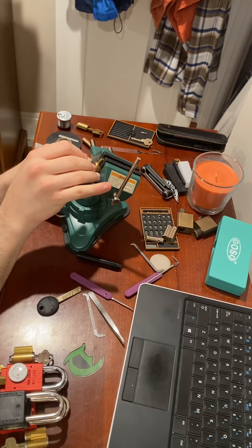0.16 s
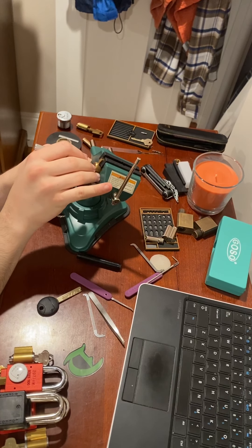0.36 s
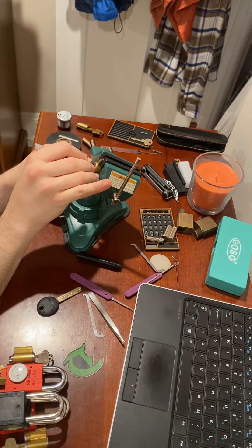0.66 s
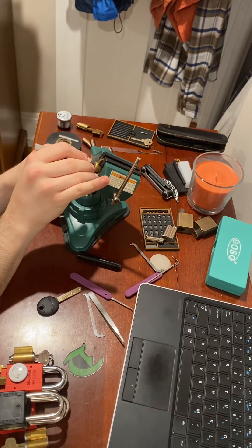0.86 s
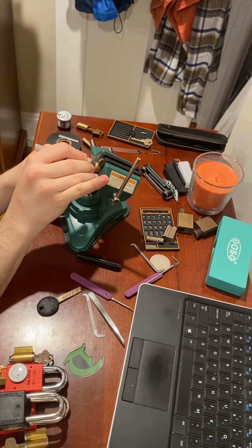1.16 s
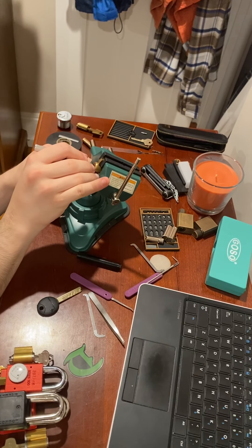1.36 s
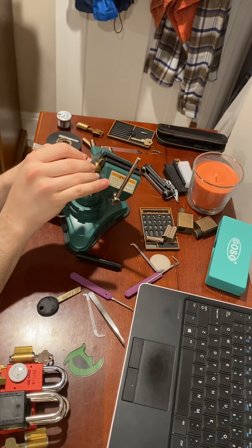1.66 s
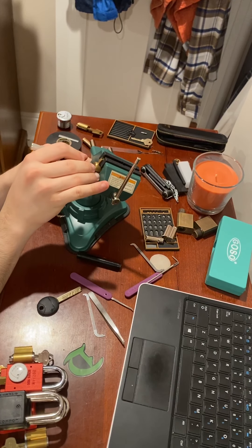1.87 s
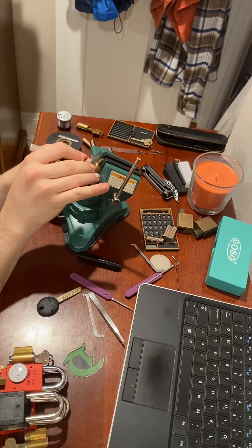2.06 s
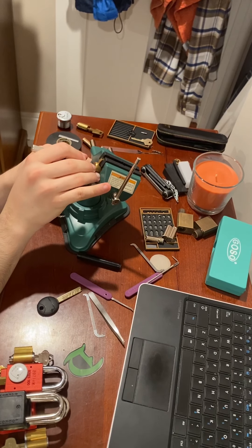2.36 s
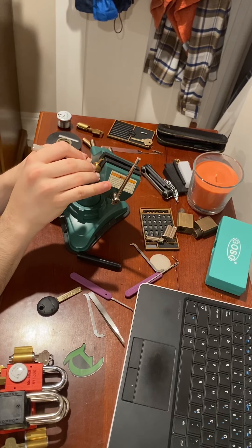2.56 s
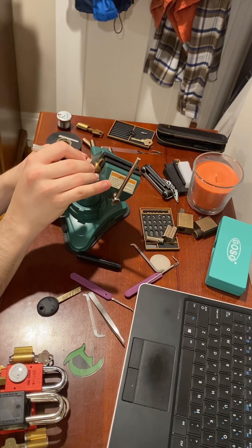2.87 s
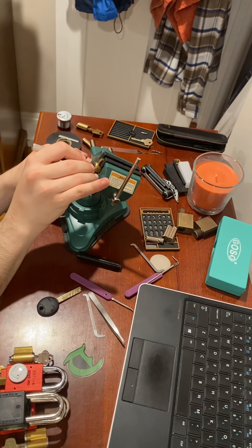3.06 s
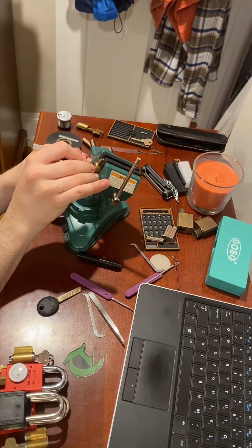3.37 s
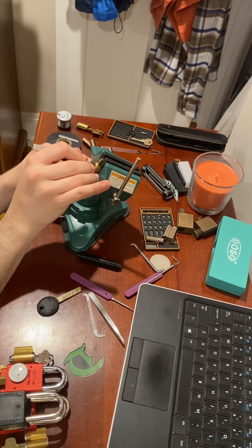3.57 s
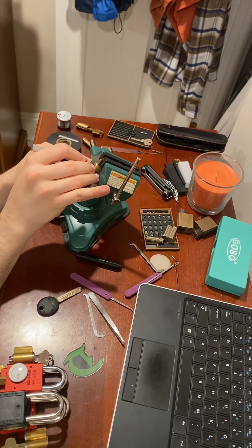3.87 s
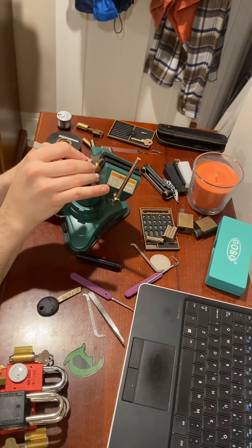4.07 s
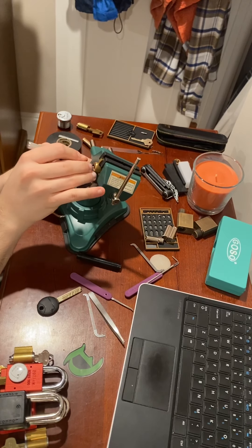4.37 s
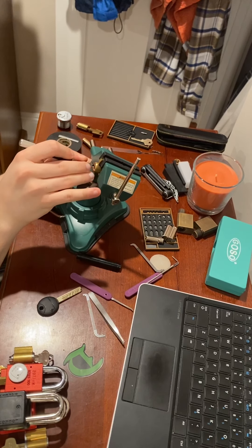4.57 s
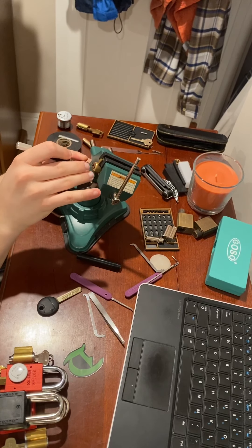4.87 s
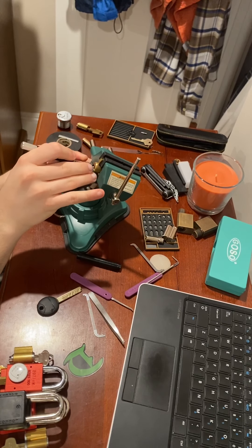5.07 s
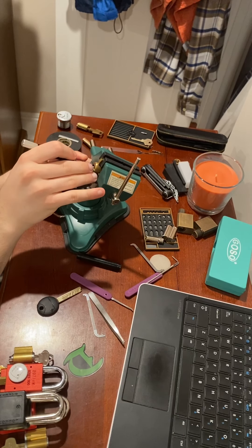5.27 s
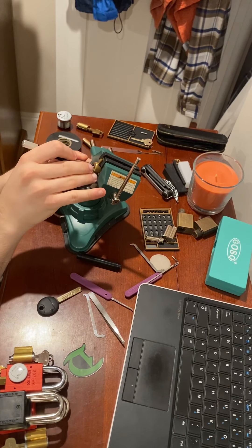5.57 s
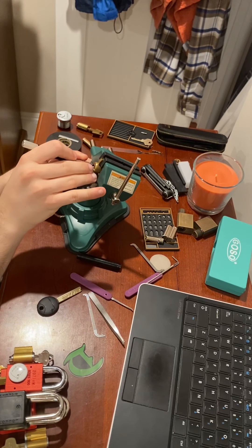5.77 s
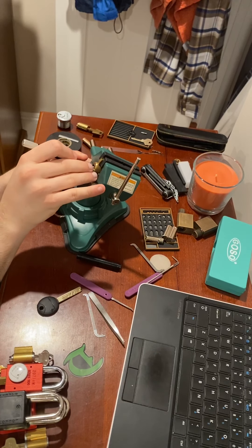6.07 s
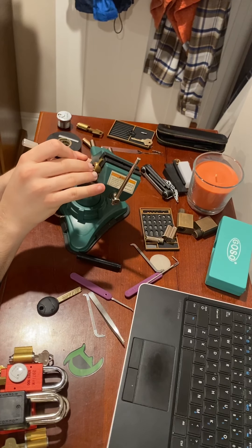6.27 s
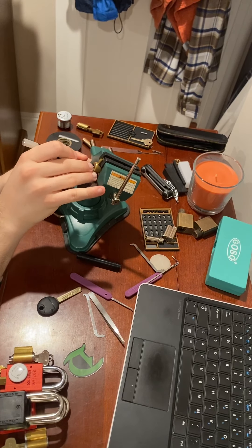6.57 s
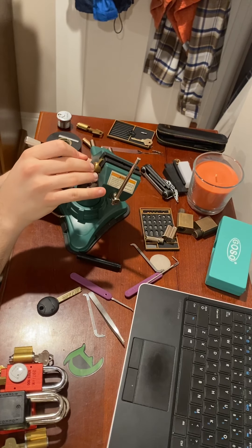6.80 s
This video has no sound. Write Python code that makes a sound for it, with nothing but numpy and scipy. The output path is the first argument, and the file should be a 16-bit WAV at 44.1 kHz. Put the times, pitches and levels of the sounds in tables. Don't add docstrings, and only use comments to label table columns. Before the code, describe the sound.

A small quiet room with steady, soft, low-heavy air, fuzzy motor and duct drones and a faint low appliance hum. Close by, a pick touches brass pins almost inaudibly at the start. Crisp little ticks come at 0.9, 1.6 (a pair with a soft desk push), a very faint one at 1.9 with a firmer push, and 2.2. After a gap, a weak tick at 2.95 leads to a much sharper click at 3.04, followed by a short dull metal rub and soft thuds. From 4.33 to 4.55 a gritty scrape carries a rapid cluster of ticks and slips, with a deep push at 4.48. Near silence follows until 6.18, when the plug grinds for an instant and snaps loudly, ringing briefly and jolting the desk with a deep after-thud. Two small ticks finish at 6.56 and 6.74. Hard reflections and a short room tail trail the clicks.

```python
import sys
import numpy as np
from scipy import signal
from scipy.fft import rfft, irfft, next_fast_len
from scipy.io import wavfile
from scipy.ndimage import uniform_filter1d

SR = 44100
rng = np.random.default_rng(int(sys.argv[2]) if len(sys.argv) > 2 else 0)


def undo_db(level):
    steps = np.asarray(level, float) / 20
    return 10 ** steps


def store_wav(level_fs):
    pcm = np.round(np.clip(np.atleast_2d(level_fs), -1, 1) * 32767)
    wavfile.write(sys.argv[1], SR, pcm.T.astype(np.int16))


N = 305921

# [t/s, blow level/dB, then re blow: lock body level/dB, vise level/dB, wrench level/dB]
TICKS = [(0.9353, -45.5, -10.5, -14, -20), (1.6066, -47.5, -12, -8, -14), (1.6632, -56.5, -12.5, -12, -24),
         (1.8931, -64, -14, -2, -10), (2.2077, -50, -17.5, -18, -25), (2.9528, -57.5, -7.5, -9, -23),
         (3.0442, -32.5, -10.5, -13.5, -24), (4.364, -48, -15, -11, -10), (4.3874, -46, -16, -13, -19),
         (4.426, -41, -18.5, -14, -16), (4.435, -54, -16, -11, -11), (4.5331, -49.5, -15, -9.5, -13),
         (4.5442, -61, -23, 0, -5), (6.561, -55, -20, 2.5, -4.5), (6.7367, -48, -14.5, -12, -10.5)]
# [t/s, blow level/dB]
TOUCHES = [
    (0.025, -69.5),
    (0.864, -70),
    (1.7033, -66.5),
    (4.0692, -74),
    (4.67, -70),
    (5.926, -71.5),
    (6.7103, -71),
]
# [t/s, blow level/dB]
SLIPS = [
    (4.349, -63),
    (4.399, -50),
    (4.41, -55),
    (4.42, -53),
]
# [lock body level/dB, vise level/dB, wrench level/dB]
TOUCH_SHARES = (-14, -1, -7.5)
SLIP_SHARES = (-11, -16, -12)
# [start t/s, hardest t/s, end t/s, level/dB, dullness 0-1]
SCRAPES = [
    (4.33, 4.42, 4.48, -56.5, 0.48),
    (3.046, 3.055, 3.078, -47.5, 0.93),
    (3.078, 3.097, 3.112, -55.5, 0.94),
    (1.54, 1.65, 1.64, -77, .5),
]
# [t/s, level/dB, pitch of the spot f/Hz, reach/octaves]
PUSHES = [
    (1.599, -48.5, 165, 0.46),
    (1.915, -43, 223, .7),
    (3.052, -47.5, 213, 0.69),
    (3.095, -48, 260, 0.84),
    (4.48, -39, 90.5, .4),
    (6.177, -32.5, 273, .9),
    (6.204, -35.5, 92, .4),
]

# [f/Hz, level/dB, t60/s]
PIN_MODES = [(7900, -3.5, 0.0053), (8520, -0.5, 0.0045), (9620, 4, 0.0023), (10400, 1, 0.0042),
             (11300, 0, 0.00272), (12540, 0, .005), (12870, -0.5, 0.0044)]
# [f/Hz, level/dB, t60/s]
TIP_MODES = [(14600, -1, .004), (15400, 1, .005)]
# [f/Hz, level/dB, t60/s]
BODY_MODES = [(3600, -11.5, 0.0056), (4050, -1.5, 0.0073), (4750, -2.5, 0.0089), (5490, -2.5, .011),
              (6260, 0.5, .011), (7200, 1.5, 0.0065)]
# [f/Hz, level/dB, t60/s]
WRENCH_MODES = [(5070, -3, 0.017), (4690, -7.5, .012)]
# [f/Hz, level/dB, t60/s]
VISE_MODES = [(793, -1, 0.0072), (1268, -7.5, 0.019), (1695, -1.5, 0.0061), (2030, -1.5, 0.0092),
              (2290, -4.5, 0.013), (3120, -2.5, 0.0055)]
# [f/Hz, level/dB, t60/s]
PLUG_MODES = [(703, -5, 0.0093), (928, -0.5, 0.014), (1210, -1.5, 0.006), (2020, -8.5, 0.0099),
              (2290, -6, 0.0087), (2548, -6, 0.014), (2990, -5, 0.0094), (3550, -4, 0.0064),
              (4175, -1, 0.012), (4720, -4.5, 0.005), (5200, -4, 0.011), (6050, -0.5, .005),
              (6500, 1, 0.0032)]
# [f/Hz, level/dB, t60/s]
STOP_MODES = [(7650, 0.5, 0.0024), (8770, 2.5, 0.0019), (10430, -5.5, 0.0053), (11470, -5, .006),
              (12900, -7, .004), (15000, -14, .003)]
# [f/Hz, level/dB, t60/s]
DESK_MODES = [(95, -1.5, 0.12), (179, 2.5, .1), (269, 2.5, 0.059), (385, -3, 0.092), (482, -2, .15)]

# [delay t/s, level/dB]
ECHOES = [(.0047, -18.5), (.0075, -16.5), (0.012, -23.5)]
# [f/Hz, t60/s]
ROOM_DECAY = [(200, 0.34), (500, 0.37), (1000, 0.24), (2000, 0.26), (3700, 0.25), (9700, 0.2),
              (13000, 0.24), (16000, 0.096)]
# [f/Hz, likeness]
ROOM_LIKENESS = [(200, .8), (1000, 0.32), (3000, 0.89), (5000, 0.47), (7000, 0.9), (16000, 1)]
# [f/Hz, density level/dB per Hz]
AIR_SPECTRUM = [(22, -34.5), (40, -8.5), (75, -6), (105, -10.5), (140, -9.5), (330, -22.5), (650, -20.5),
                (1500, -25), (2800, -30), (4500, -33.5), (7000, -44), (10000, -48), (13500, -57.5),
                (15000, -85.5)]
# [f/Hz, likeness]
AIR_LIKENESS = [(60, 0.97), (150, 0.98), (290, 0.72), (600, -0.23), (1400, -0.079), (2000, 0.41),
                (2800, 0.12), (4000, 0.38), (5300, 0.86), (7300, 1), (8700, 0.73), (10200, 1), (11500, .98),
                (13600, 1)]
# [f/Hz, width/Hz, level over air/dB]
DRONES = [(55.8, 4.1, 7.5), (157.6, 12, 8), (189.9, 14, 11.5), (226.3, 11.4, 9), (275.4, 16.2, 10),
          (576, 18, 8), (667, 160, 3.5), (958, 38, 6), (2053, 150, 5), (2740, 350, 3.5), (3990, 220, 2)]
# [f/Hz, rms level/dB]
HUM = [(119.8, -58), (59.4, -64)]
# [f/Hz, lag/cycles]
PORT_LAG = [(0, 0), (2000, .04), (2700, .2), (3500, .07), (5000, .03), (7450, .5), (10650, 1), (13700, 1.5),
            (17000, 2.1)]

TICK_RATTLE_S, TICK_ROOM_DB = 0.0035, -7.5
TIP_DB, TIP_DAMPING, SLACK_WRENCH_DB = -18, 1, -20
PIN_SPREAD_DB, BODY_SPREAD_DB = 1.8, 2.0
WRENCH_IN_ROOM = 0.45
SNAP_S, SNAP_DB, SNAP_RATTLE_S, SNAP_ROOM_DB = 6.1756, -22, 0.0037, -6.3
SNAP_BLUR_S = 0.004
SNAP_SHADE_HZ = 12000
TURN_S, TURN_DB, TURN_RISE_DB = 0.018, -45, 13
STROKE_ENDS_DB = -30
AIR_DB = -57.5
TOP_HZ = 15600


def evened(x):
    return x / np.sqrt(np.mean(x ** 2) + 1e-30)


def read(points, hz):
    f, value = np.transpose(points)
    return np.interp(np.log(hz + 1), np.log(f), value)


def add(mix, s, sound):
    part = mix[round(s * SR):][:len(sound)]
    part += sound[:len(part)]


def ring(modes, spread_db=0.):
    hz, db, t60 = np.transpose(modes)[:, :, None]
    db = db + spread_db * rng.standard_normal(db.shape)
    t = np.arange(2000) / SR
    sign = (-1) ** np.arange(len(modes))[:, None]
    partials = sign * undo_db(db - 60 * t / t60) * np.sin(2 * np.pi * hz * t)
    x = partials.sum(0)
    return x / np.linalg.norm(x)


def rattle(length_s, per_s=9000, count=3, size=5):
    t = np.arange(1024) / SR
    chance, strength = rng.random((2, 1024))
    swell = 1 - 0.8 * np.exp(-t / 0.0007)
    shape = swell * np.exp(-(t / max(length_s, 1e-4)) ** 2.5)
    contacts = (chance < per_s / SR) * (2 * strength - 1) * shape
    for _ in range(count):
        z = rfft(contacts)
        flat = z / np.sqrt(uniform_filter1d(abs(z) ** 2, size=size) + 1e-12)
        contacts = irfft(flat) * (shape > 0.05)
    return contacts / np.linalg.norm(contacts)


def pin_ticks():
    near, far = np.zeros(N), np.zeros(N)
    touches = [(*row, *TOUCH_SHARES) for row in TOUCHES]
    slips = [(*row, *SLIP_SHARES) for row in SLIPS]
    for s, db, body_db, vise_db, wrench_db in [*TICKS, *touches, *slips]:
        tip_db = TIP_DB - TIP_DAMPING * max(wrench_db - SLACK_WRENCH_DB, 0)
        metal = ring(PIN_MODES, PIN_SPREAD_DB)
        metal = metal + undo_db(body_db + 8.5) * ring(BODY_MODES, BODY_SPREAD_DB)
        metal = metal + undo_db(tip_db + 8.0) * ring(TIP_MODES, 1.5)
        wrench = undo_db(wrench_db + 5.5) * ring(WRENCH_MODES, 1.3)
        vise = undo_db(vise_db + 4.0) * ring(VISE_MODES, 1.4)
        tick = np.convolve(rattle(TICK_RATTLE_S, count=6, size=3), metal + wrench)
        tick = tick + np.convolve(rattle(3.7 * TICK_RATTLE_S), vise)
        add(near, s, undo_db(db + 20.5) * tick)
        add(far, s, undo_db(db + 18.0 + TICK_ROOM_DB) * (metal + WRENCH_IN_ROOM * wrench + vise))
    return near, far


def plug_snap():
    near, far = np.zeros(N), np.zeros(N)
    low_cut = signal.butter(2, 520., "high", fs=SR, output="sos")
    shade = signal.butter(8, SNAP_SHADE_HZ, fs=SR, output="sos")
    plug = undo_db(SNAP_DB + 25.5) * signal.sosfilt(low_cut, ring([*PLUG_MODES, *STOP_MODES]))
    add(near, SNAP_S, np.convolve(rattle(SNAP_RATTLE_S, count=12, size=2), plug))
    blurred = plug * np.exp(-np.arange(len(plug)) / SR / SNAP_BLUR_S)
    add(far, SNAP_S, undo_db(SNAP_ROOM_DB) * signal.sosfilt(shade, blurred))
    return near, far


def plug_turn():
    t, out = np.arange(round(TURN_S * SR)) / SR, np.zeros(N)
    grit = rng.standard_normal(len(t)) * undo_db(TURN_RISE_DB * (t / TURN_S - 1.5))
    add(out, SNAP_S - TURN_S, undo_db(TURN_DB) * np.convolve(grit, ring(PLUG_MODES[5:11])))
    return out


def scrapes():
    grit = rng.standard_normal(N) * (rng.random(N) < 5000 / SR)
    bright = evened(signal.oaconvolve(grit, ring([*PIN_MODES, *TIP_MODES]))[:N])
    dull_metal = 0.33 * ring(BODY_MODES) + 0.42 * ring(WRENCH_MODES) + ring(VISE_MODES)
    body = evened(signal.oaconvolve(grit, dull_metal)[:N])
    out, t = np.zeros(N), np.arange(N) / SR
    for start, hardest, end, db, dull in SCRAPES:
        slack = np.interp(t, sorted([start, hardest, end]), [1, 0, 1])
        pressure = (slack < 1) * undo_db(db + STROKE_ENDS_DB * slack ** 2)
        out += pressure * ((1 - dull) * bright + dull * body)
    return out


def desk_thuds():
    out, t = np.zeros(N), np.arange(9000) / SR
    hz, mode_db, t60 = np.transpose(DESK_MODES)[:, :, None]
    swing_up = 1 - np.exp(-t / 0.0036)
    notes = undo_db(mode_db - 60 * t / t60) * swing_up * np.sin(2 * np.pi * hz * t)
    for s, db, spot_hz, reach in PUSHES:
        octaves_off = np.log2(hz / spot_hz)
        add(out, s, (undo_db(db - 10 * (octaves_off / reach) ** 2) * notes).sum(0))
    return out


def echoed(x):
    out = x.copy()
    for delay_s, db in ECHOES:
        add(out, delay_s, undo_db(db) * x)
    return out


def room(x):
    taps, slots = np.zeros((2, SR // 2)), np.arange(180, SR // 2 - 8, 8)
    at = slots + rng.integers(0, 8, (2, len(slots)))
    np.put_along_axis(taps, at, rng.choice([-1., 1.], at.shape), 1)
    hz, t, z = signal.stft(taps, SR, nperseg=128)
    same = np.clip(read(ROOM_LIKENESS, hz), -1, 1)[:, None]
    z = np.array([z[0], same * z[0] + np.sqrt(1 - same ** 2) * z[1]])
    z = z * undo_db(-60 * t / read(ROOM_DECAY, hz)[:, None])
    tail = signal.istft(z, SR, nperseg=128)[1]
    return signal.fftconvolve(x[None], tail / np.linalg.norm(tail[0]), axes=1)[:, :N]


def air():
    frames, hz = N // 2048 + 5, np.fft.rfftfreq(8192, 1 / SR)
    a, b, c, d, drift = rng.standard_normal((frames, len(hz), 5)).T
    drift = uniform_filter1d(drift, size=40, axis=0)
    drift = evened(uniform_filter1d(drift, size=4, axis=1))
    drones = np.zeros(len(hz))
    for f, width, db in DRONES:
        drones += (undo_db(2 * db) - 1) / (1 + (2 * (hz - f) / width) ** 2) ** 2
    same = np.clip(read(AIR_LIKENESS, hz), -1, 1)[:, None]
    left, other = a + 1j * b, c + 1j * d
    z = np.array([left, same * left + np.sqrt(1 - same ** 2) * other]) * undo_db(1.44 * drift)
    z *= (undo_db(read(AIR_SPECTRUM, hz)) * np.sqrt(1 + np.maximum(drones, 0)))[:, None]
    noise = signal.istft(z, nperseg=8192, noverlap=6144)[1][:, :N]
    return undo_db(AIR_DB) * evened(noise)


def hum():
    t, out = np.arange(N) / SR, np.zeros(N)
    for hz, db in HUM:
        out += np.sqrt(2) * undo_db(db) * np.sin(2 * np.pi * (hz * t + rng.random()))
    return out


def scene():
    tick_near, tick_far = pin_ticks()
    snap_near, snap_far = plug_snap()
    slide = scrapes()
    lock = echoed(tick_near + snap_near + slide) + plug_turn()
    tail = room(tick_far + snap_far + undo_db(-3.5) * slide)
    return lock + desk_thuds() + tail + air() + hum()


def roll_off(x):
    return signal.sosfilt(signal.butter(12, 16990, fs=SR, output="sos"), x)


def record(dry):
    size = next_fast_len(N + 256)
    hz = np.fft.rfftfreq(size, 1 / SR)
    lag = np.outer([0, 1], np.interp(hz, *np.transpose(PORT_LAG)))
    fade = 1 / np.sqrt(1 + (hz / TOP_HZ) ** 80)
    ports = irfft(rfft(dry, size) * np.exp(-2j * np.pi * lag) * fade, size)[:, :N]
    return roll_off(ports)


dry = scene()
out = record(dry)
store_wav(out)
```